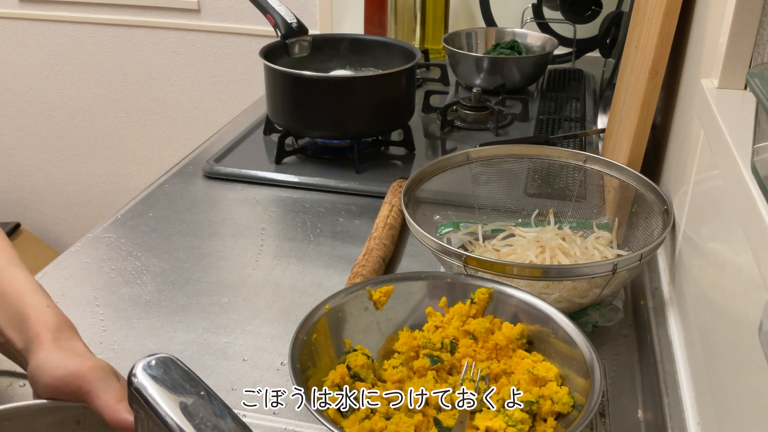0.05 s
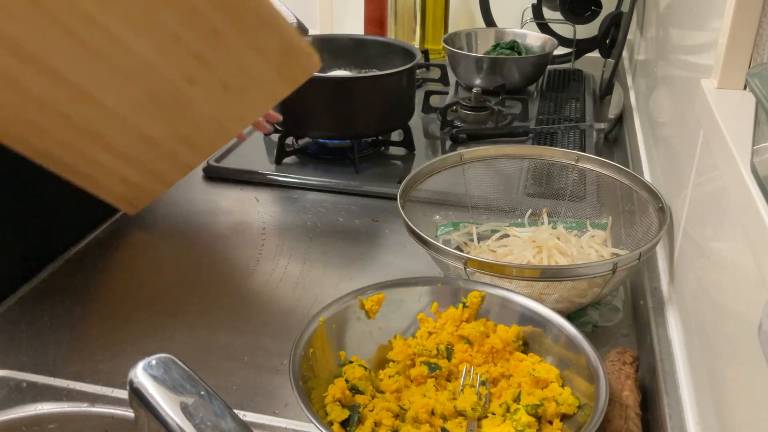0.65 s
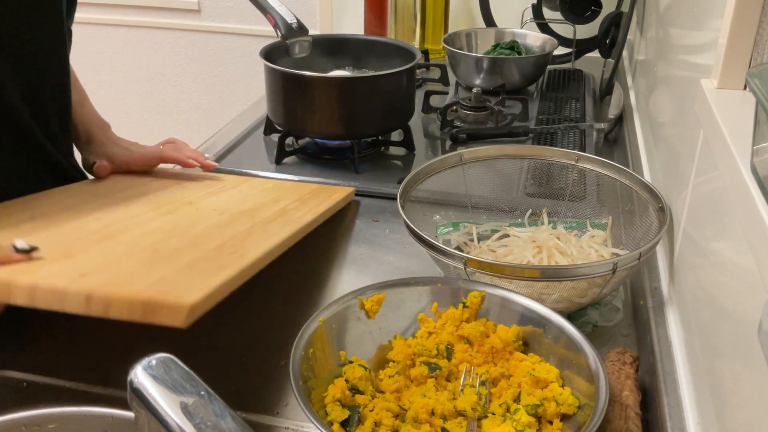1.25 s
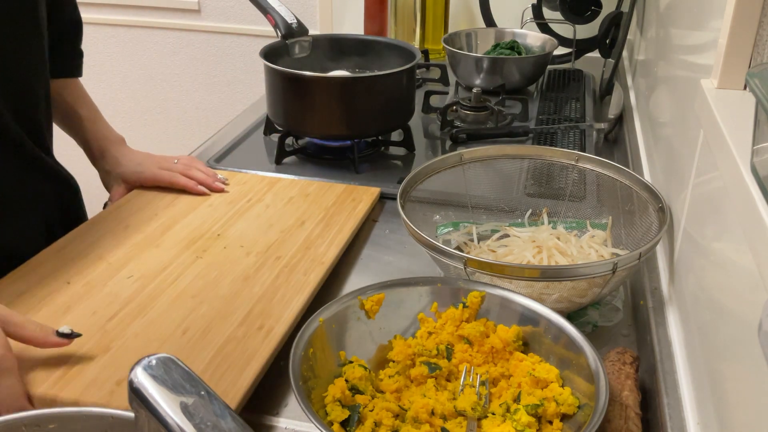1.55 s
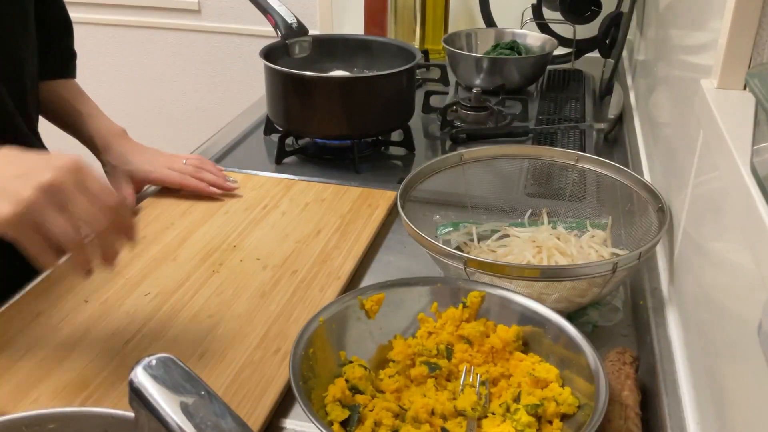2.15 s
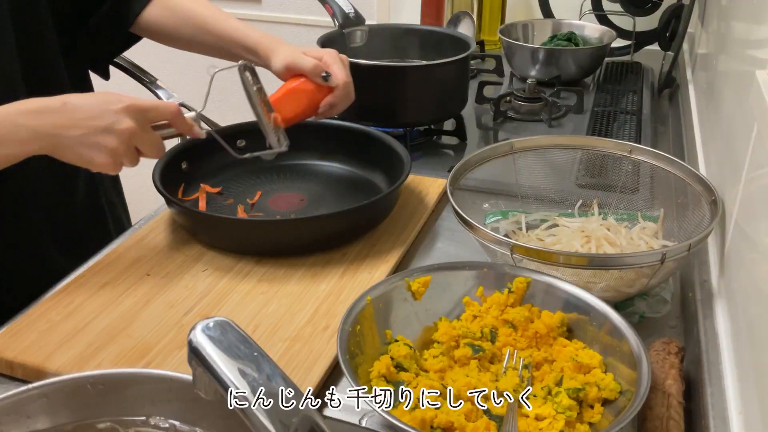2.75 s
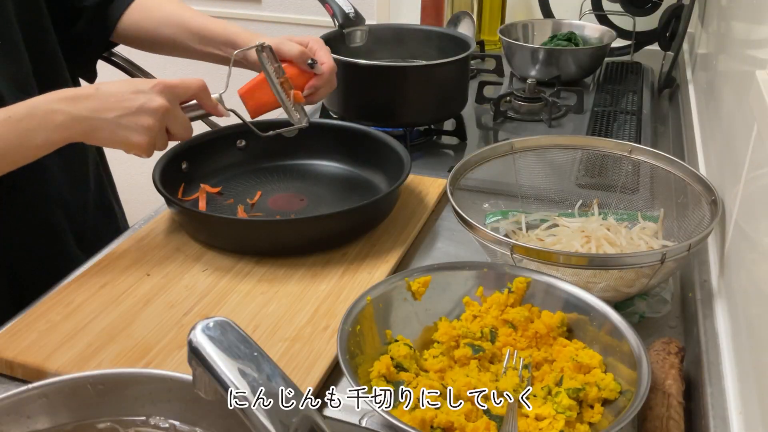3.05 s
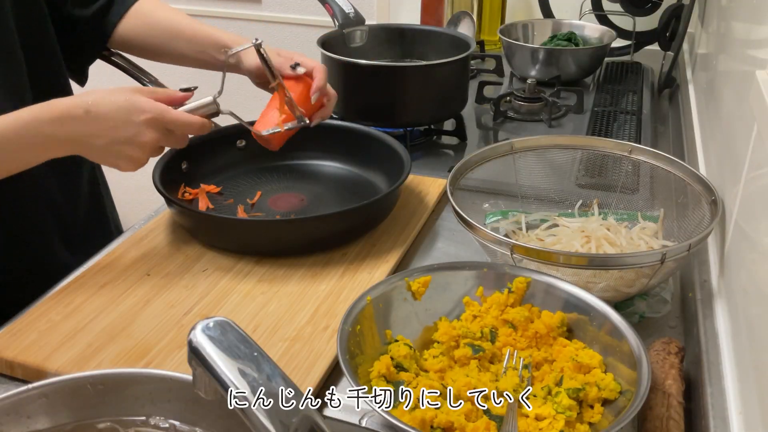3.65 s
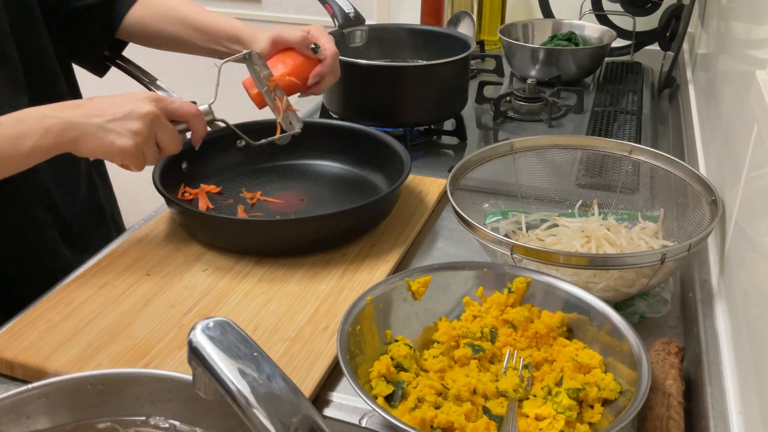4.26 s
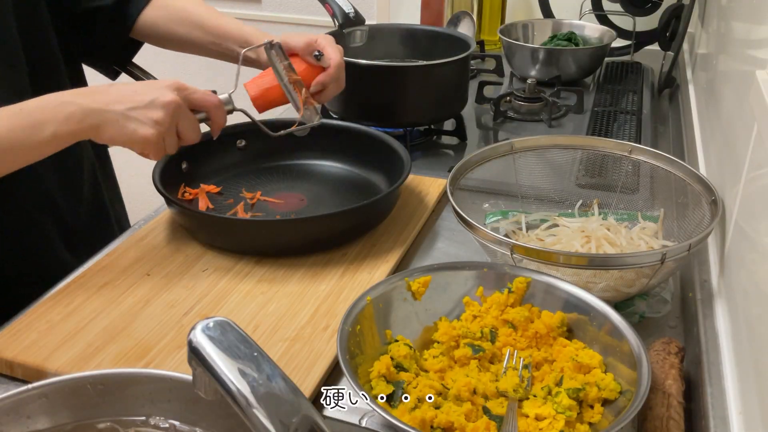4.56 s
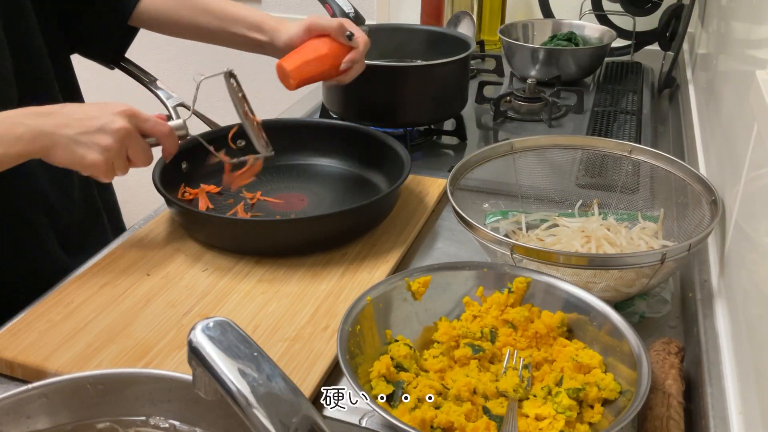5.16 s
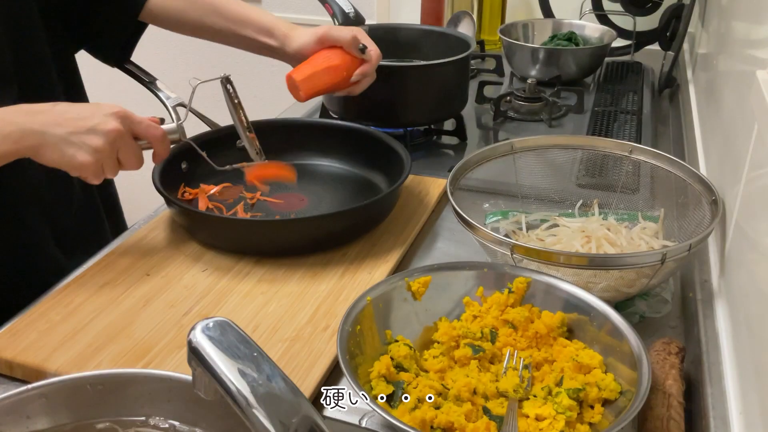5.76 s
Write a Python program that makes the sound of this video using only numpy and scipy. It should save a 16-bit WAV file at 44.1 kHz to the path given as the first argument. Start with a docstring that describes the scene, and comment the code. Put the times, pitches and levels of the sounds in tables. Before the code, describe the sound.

A wooden cutting board knocks, slides and bangs onto a steel counter, then a peeler faintly rasps through a carrot over a low hum.

```python
"""A cooker hood and a gas flame hum in a small tiled kitchen, where a wooden cutting board knocks and
slides over a steel counter, then drops flat with a bang. Each impact excites the damped modes of the
wood and of the hollow counter; sliding friction drives the wood continuously. After a jump in time a
julienne peeler rasps through a hard carrot in short jerks: crisp cells burst, and the loose blade
ticks against its stop. The hum goes on throughout, and the room adds its reverberation."""
import sys
import numpy as np
from scipy import signal
from scipy.fft import rfft, irfft
from scipy.io import wavfile
from scipy.ndimage import uniform_filter1d, minimum_filter1d

SR = 44100
rng = np.random.default_rng(int(sys.argv[2]) if len(sys.argv) > 2 else 0)


def dump(signal):
    """Clip the signal to [-1, 1] and save it as 16-bit WAV at the path in sys.argv[1]."""
    limited = np.clip(np.atleast_2d(signal).T, -1, 1)
    pcm = np.round(limited * 32767).astype(np.int16)
    wavfile.write(sys.argv[1], SR, pcm)


N = 265482
TIME = np.arange(N) / SR


def undb(db):
    """Amplitude grows tenfold for every 20 decibels."""
    return 10 ** (np.asarray(db) / 20)


def unit(x):
    """Normalisation to an rms of 1."""
    return x / np.sqrt(np.mean(x ** 2))


def along(points, hz):
    """Interpolation of (Hz, value) points on a logarithmic frequency axis."""
    f, value = np.transpose(points)
    return np.interp(np.log(np.maximum(hz, 1)), np.log(f), value)


def colour(x, points):
    """Spectral shaping: each frequency is weighted by a curve of (Hz, dB) points."""
    return irfft(rfft(x) * undb(along(points, np.fft.rfftfreq(len(x), 1 / SR))), len(x))


def cut(x, hz, kind, order=2):
    """A low-pass or high-pass filter falls 6 dB per octave for each order."""
    return signal.sosfilt(signal.butter(order, min(hz, .45 * SR), kind, fs=SR, output="sos"), x)


def resonate(x, peaks):
    """Forced vibration: parallel resonators each pass a band around their own frequency."""
    return sum(undb(db) * signal.lfilter(*signal.iirpeak(hz, hz / width, fs=SR), x)
               for hz, width, db in peaks)


def ring(modes, t, scatter_db):
    """Free vibration: damped modes, among which every strike shares its energy a little differently."""
    hz, db, t60 = np.transpose(modes)[:, :, None]
    amplitude = undb(db + scatter_db * rng.standard_normal(db.shape))
    decay = np.exp(-np.log(1000) * t / t60)
    return np.sum(amplitude * np.sin(2 * np.pi * hz * t) * decay, axis=0) / np.sqrt(len(modes))


def wander(rate_hz):
    """Random modulation: a line through random values, with a spread near 1."""
    knots = rng.standard_normal(N // 100)
    return np.interp(TIME * rate_hz, np.arange(len(knots)), knots)


def grains(per_s, spread_db):
    """Shot noise: tiny independent impulses, a few much larger than the rest."""
    size = undb(spread_db * np.minimum(rng.exponential(size=N), 4))
    return rng.standard_normal(N) * size * (rng.random(N) < per_s / SR)


def add(out, s, sound):
    """Superposition: a sound joins the mix at s seconds."""
    start = max(int(s * SR), 0)
    out[start:start + len(sound)] += sound[:N - start]


def kitchen(x, wet_db, gap_s=0.0037):
    """Reverberation: dense reflections follow the direct sound, and their treble dies first."""
    # The room's decay. Each row: frequency in Hz, time to fall 60 dB in seconds.
    decay_times = [(100, 0.5), (260, 0.56), (700, 0.43), (1840, 0.34), (4850, 0.27), (12800, 0.29)]
    t = TIME[:SR * 3 // 4]
    hz, noise = np.fft.rfftfreq(len(t), 1 / SR), rfft(rng.standard_normal(len(t)))
    tail = 0
    for band, (_, t60) in enumerate(decay_times):
        share = along([(f, j == band) for j, (f, _) in enumerate(decay_times)], hz)
        tail = tail + irfft(noise * share, len(t)) * np.exp(-np.log(1000) * t / t60)
    tail = tail * np.clip(t / gap_s - 1, 0, 1)
    return x + undb(wet_db) * signal.fftconvolve(x, tail / np.linalg.norm(tail))[:N]


def hood_and_flame(spectrum, duct, db):
    """Flow noise of air and flame is coloured by duct resonances; the low hum flutters a little."""
    air = colour(rng.standard_normal(N), spectrum)
    air = air + resonate(air, duct)
    flutter = cut(air, 500, "low") * (undb(1.2 * wander(rate_hz=12)) - 1)
    return undb(db) * unit(air + flutter)


def air_cushion():
    """Flow noise swells as the falling board squeezes out the air beneath it."""
    swell = np.interp(TIME, [1.94, 2.0, 2.022, 2.03], [0.036, 0.34, 0.85, 0.035])
    rush = cut(rng.standard_normal(N), 500, "low", order=1)
    return undb(-45.5) * swell * unit(cut(rush, 90, "high"))


def board_slide():
    """Sliding friction: countless small slips of the board's edge on the steel drive the wood's modes."""
    # The course of the drag. Each row: time in seconds, level in dB.
    drag_levels = [(0.88, -42), (1.038, -43), (1.068, -34.5), (1.252, -31), (1.26, -31)]
    # Resonances of the dragged board. Each row: frequency in Hz, bandwidth in Hz, relative gain in dB.
    drag_modes = [(222.3, 4.2, 3), (361, 6.4, 8), (549, 47, -3.5), (846, 29, -18.5), (1040, 49, -16.5),
                  (1384, 68, -19), (1618, 32, -16.5), (1955, 320, -19), (2630, 87, -21.5), (2930, 170, -18),
                  (3420, 28, -23), (4070, 230, -18)]
    # The dry rub. Each row: frequency in Hz, relative level in dB.
    rub_spectrum = [(100, -21), (330, -1), (800, 13.5), (1500, -3), (2800, 0), (5000, -14), (9000, -39),
                    (16000, -62)]
    s, db = np.transpose(drag_levels)
    pressure = undb(np.interp(TIME, s, db)) * np.interp(TIME, [.84, .9, 1.275, 1.3], [0, 1, 1, 0])
    slips = grains(per_s=5000, spread_db=2) * undb(1.2 * wander(rate_hz=60))
    wood = unit(resonate(cut(slips, 2300, "low"), drag_modes))
    scrape = undb(-0.5) * wood + undb(-6.5) * unit(colour(slips, rub_spectrum))
    # A faint dry swish runs ahead of the full contact.
    swish = unit(cut(rng.standard_normal(N), 2800, "high", order=1))
    swish *= np.interp(TIME, [.82, 1.0, 1.27, 1.3], [0, 1, 1, 0])
    return kitchen(scrape * pressure + undb(-51.5) * cut(swish, 6800, "low"), wet_db=-7)


def impacts():
    """Impact excitation: yields the timing, strength and bandwidth of each blow of board on counter."""
    # The board lands on an edge, then its face settles. Each row: start in seconds, contact level in dB,
    # low-pass and high-pass cutoffs in Hz, chatter time constant in seconds, wood level in dB,
    # counter boom level in dB, settling delay in seconds.
    landings = [(0.7082, -24.5, 9200, 300, 0.0057, -34, -11.5, 0.013),
                (0.8041, -13, 1900, 280, 0.0045, -33, -17, 0.015),
                (1.2715, -4.5, 4170, 910, 0.0055, -9, -38, .024),
                (1.3114, -12, 10000, 610, 0.02, -22.5, -7, .012),
                (2.0242, 1.5, 7600, 4140, 0.0055, -19, 5, .0052)]
    # Soft bumps. Each row: start in seconds, contact level in dB, counter boom level in dB.
    bumps = [(0.003, -56, -20.5), (0.185, -40, -28), (0.74, -22, -48), (1.411, -30.5, -11.5)]
    # Light nudges into place. Each row: start in seconds, contact level in dB, low-pass cutoff in Hz.
    scuffs = [(1.556, -34, 5500), (1.569, -33.5, 14000), (1.623, -45, 13000)]
    edge_push_s = .001
    for s, db, dull_hz, thin_hz, chatter_s, wood_db, boom_db, settle_s in landings:
        yield s, db, dull_hz, thin_hz, chatter_s, wood_db, boom_db, edge_push_s
        # The face is weaker and duller than the edge, and chatters longer.
        # The faster it settles, the deeper its bass and the shorter its push.
        thin_hz, push_s = 16000 * settle_s, 0.21 * settle_s
        yield (s + settle_s, db - 10.5, 0.59 * dull_hz, thin_hz,
               1.42 * chatter_s, wood_db - 4.5, boom_db, push_s)
    for s, db, boom_db in bumps:
        dull_hz, thin_hz, chatter_s, wood_db, push_s = 610, 233, 0.025, db - 24, .0022
        yield s, db, dull_hz, thin_hz, chatter_s, wood_db, boom_db, push_s
    for s, db, dull_hz in scuffs:
        thin_hz, chatter_s, wood_db, boom_db = 2680, 0.0074, db - 8.5, db - 14
        yield s, db, dull_hz, thin_hz, chatter_s, wood_db, boom_db, edge_push_s


def contact(x, t, chatter_s, thin_hz, dull_hz):
    """Contact limits the bandwidth: a soft blow has less treble, and a glancing one builds gradually."""
    onset = 1 - np.exp(-t / (0.11 * chatter_s))
    thinned = cut(x, thin_hz, "high", order=1)
    return cut(thinned * onset, dull_hz, "low", order=3)


def board_chatter():
    """Contact noise: wood rattles on steel at each blow, in a brief burst that decays exponentially."""
    # Wood meeting steel. Each row: frequency in Hz, relative level in dB.
    rattle_spectrum = [(60, 9), (200, 1), (500, 2.5), (1000, -1), (2000, -6), (3500, -9), (5500, -8),
                       (8000, -14.5), (11000, -14.5), (16000, -13.5)]
    out, t = np.zeros(N), TIME[:2 ** 13]
    for s, db, dull_hz, thin_hz, chatter_s, *_ in impacts():
        rattle = unit(colour(rng.standard_normal(len(t)), rattle_spectrum)) * np.exp(-t / chatter_s)
        add(out, s, undb(db) * contact(rattle, t, chatter_s, thin_hz, dull_hz))
    return out


def board_blows():
    """Modal response to impact: each blow chatters, rings the wood and makes the hollow counter boom."""
    # Modes of the board and of the steel counter.
    # Each row: frequency in Hz, relative level in dB, time to fall 60 dB in seconds.
    wood_modes = [(357, 2, 0.17), (586, -15, 0.049), (869, 2, 0.13), (924, 6, 0.13), (1022, 0, 0.096),
                  (1376, 8, 0.028), (1704, 7, 0.073), (1853, -1, 0.099), (1970, -1, 0.13),
                  (2185, -5.5, 0.184), (2363, 5, 0.046), (2390, -14.5, 0.094), (2668, 2.5, 0.064),
                  (3000, -6, 0.13), (4000, 6.5, 0.032), (5170, 5.5, 0.063), (5750, -6, .06)]
    counter_modes = [(88, -15, 0.23), (107, -21.5, 0.092), (122.9, -7.5, 0.25), (146.4, -8.5, 0.24),
                     (177.6, -3.5, 0.12), (289, -24, 0.32), (373.4, -9, 0.092), (401.6, 0.5, 0.11),
                     (443, -27, 0.24), (517.6, -20, 0.43), (624, -27.5, 0.59), (785, -17, 0.47),
                     (1108, -10.5, 0.19), (1270, -9, 0.29)]
    knock, boom, t = np.zeros(N), np.zeros(N), TIME[:2 ** 14]
    for s, _, dull_hz, thin_hz, chatter_s, wood_db, boom_db, push_s in impacts():
        wood = ring(wood_modes, t, scatter_db=1.5)
        add(knock, s, undb(wood_db) * contact(wood, t, chatter_s, thin_hz, dull_hz))
        push = np.sin(np.pi * np.minimum(t[:SR // 100] / push_s, 1))  # half-sine force pulse
        steel = signal.fftconvolve(ring(counter_modes, t, scatter_db=.7), push / push.sum())
        # A corner excites less of the deep bass than the whole face does.
        add(boom, s, undb(boom_db) * cut(steel, thin_hz / 2, "high"))
    # Four independent rattles, each with its own reverberation, blend into one clack with a smooth tail.
    clack = sum(kitchen(board_chatter(), wet_db=-7) for _ in range(4)) / 2
    return clack + kitchen(knock, wet_db=-7) + kitchen(boom, wet_db=-16)


def peeler():
    """Brittle fracture: each jerk bursts a crowd of crisp cells; the blade rings as it hits its stop."""
    # The first row is a faint click at the jump in time; the others are jerks through the carrot.
    # Each row: centre in seconds, level in dB, half-width in seconds.
    bursts = [(2.418, -55, .005), (2.512, -52, .005), (2.628, -42, 0.0084), (3.035, -53, .008),
              (3.071, -50, 0.0096), (3.126, -48, 0.011), (3.219, -50, .005), (3.309, -51.5, .005),
              (3.431, -45, 0.0098), (4.208, -47, .009), (4.283, -47.5, 0.0096), (4.382, -48, .008),
              (4.59, -49.5, 0.01), (4.661, -46.5, 0.014), (4.71, -46.5, 0.0084), (4.929, -43.5, 0.0044),
              (5.016, -51, .013), (5.05, -51.5, .012), (5.139, -47.5, 0.0072), (5.468, -51, .012),
              (5.532, -48, 0.0096), (5.637, -55, .011), (5.743, -46, 0.0053)]
    # Tearing cells. Each row: frequency in Hz, relative level in dB.
    tear_spectrum = [(1000, -16.5), (3500, -8.5), (5200, -11.5), (6000, -1.5), (7100, -12), (7950, 4),
                     (9500, 0), (11500, 0.5), (13500, 0.5), (15600, -1.5)]
    # The blade hits its stop. Each row: start in seconds, click level in dB, freedom to swing (0 to 1).
    ticks = [(2.7056, -44.5, 0.9), (3.5297, -51, .2), (4.104, -47, .35), (4.499, -46, 0),
             (4.5484, -38.5, 0.4), (4.793, -42.5, .35), (4.801, -42.5, .2), (4.92, -39.5, 0.6),
             (5.22, -42.5, 0.2), (5.336, -43, 0.4), (5.7415, -48, 0.2), (5.8205, -42.5, .9)]
    # The steel blade. Each row: frequency in Hz, relative level in dB, time to fall 60 dB in seconds.
    blade_modes = [(8500, -6, .025), (10400, 1, 0.056), (10700, -3, 0.044), (11430, 2, 0.059),
                   (14300, 2, .045), (15330, -3, .035)]
    envelope = np.sqrt(sum(undb(db) ** 2 * np.exp(-((TIME - s) / half_s) ** 2 / 2)
                           for s, db, half_s in bursts))
    cells = grains(per_s=6000, spread_db=2.5) * undb(1.3 * wander(rate_hz=250))
    out = envelope * unit(colour(cells, tear_spectrum))
    t = TIME[:SR // 5]
    for s, click_db, freedom in ticks:
        # A held blade clacks low; a free one ticks high and rings.
        thin_hz = np.interp(freedom, [0, 1], [3200, 8000])
        ring_db = click_db + np.interp(freedom, [0, 1], [-17, 3])
        click = cut(rng.standard_normal(len(t)) * np.exp(-t / 0.0025), thin_hz, "high")
        add(out, s, undb(click_db) * click + undb(ring_db) * ring(blade_modes, t, scatter_db=1.5))
    return kitchen(out, wet_db=-11)


def scene():
    """Superposition over the hum: the board is laid down, then a quick crossfade leads to the peeling."""
    # Hood and flame before and after the jump. Each row: frequency in Hz, relative density in dB.
    hum_early = [(30, -63.5), (60, -21.5), (100, -12), (143, 3.5), (220, -14), (330, -20), (410, -9.5),
                 (580, -21), (1400, -20), (2500, -26), (3800, -31.5), (7500, -35), (11000, -43.5),
                 (16000, -50)]
    hum_late = [(50, -62), (105, -35), (200, -9.5), (290, 1.5), (450, -15.5), (650, -16.5), (900, -15.5),
                (1200, -16.5), (2700, -18.5), (4200, -22), (7300, -29.5), (8500, -28), (12000, -32.5),
                (16000, -36)]
    # Resonances of the hood's duct. Each row: frequency in Hz, bandwidth in Hz, gain in dB re the hum.
    duct_early = [(303, 12, 7), (725, 14, 7)]
    duct_late = [(294.4, 19.4, -1.5), (359, 8.2, 3.5), (592, 10.2, 7), (822, 79, 4.5), (957, 11, 9),
                 (1487, 50, -3), (2653, 29, 4.5), (4350, 16.5, 10)]
    jump_s, crossfade_s = 2.418, 0.0071
    later = np.clip((TIME - jump_s) / crossfade_s + .5, 0, 1)
    board = board_blows() + board_slide() + air_cushion()
    first_hum = hood_and_flame(hum_early, duct_early, db=-51)
    second_hum = hood_and_flame(hum_late, duct_late, db=-52)
    return ((1 - later) * (board + first_hum) + later * second_hum + peeler())[None]


def record(dry):
    """Band and peak limiting: the microphone drops deep bass, a limiter holds peaks, the top is cut."""
    ceiling, window_samples, top_hz = .66, 45, 16000
    x = cut(dry, 72, "high", order=7)
    gain = minimum_filter1d(ceiling / np.maximum(np.abs(x), ceiling), size=window_samples)
    limited = x * uniform_filter1d(gain, size=window_samples)
    return signal.sosfilt(signal.ellip(10, .2, 80, top_hz, fs=SR, output="sos"), limited)


dry = scene()
out = record(dry)
dump(out)
```